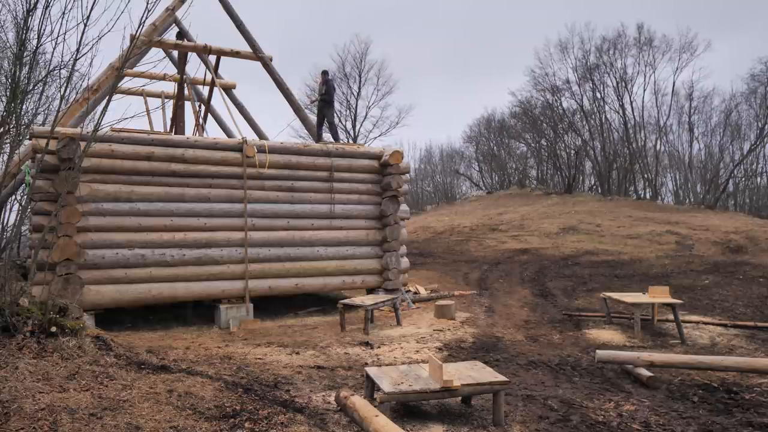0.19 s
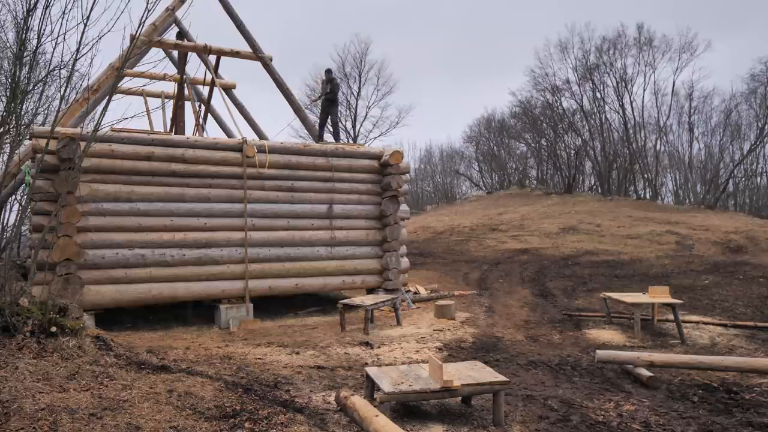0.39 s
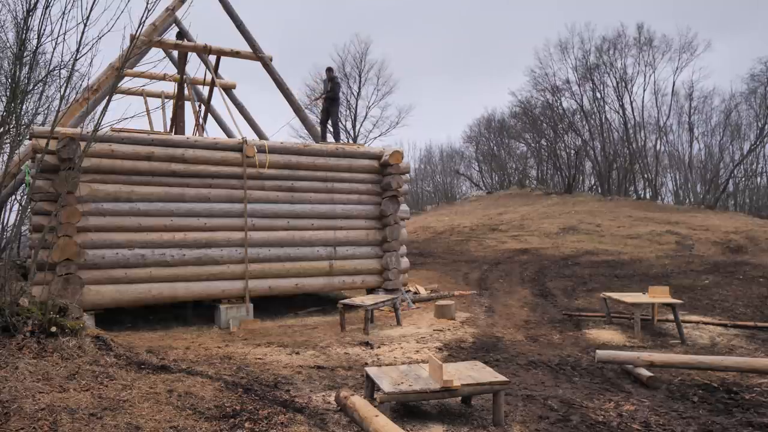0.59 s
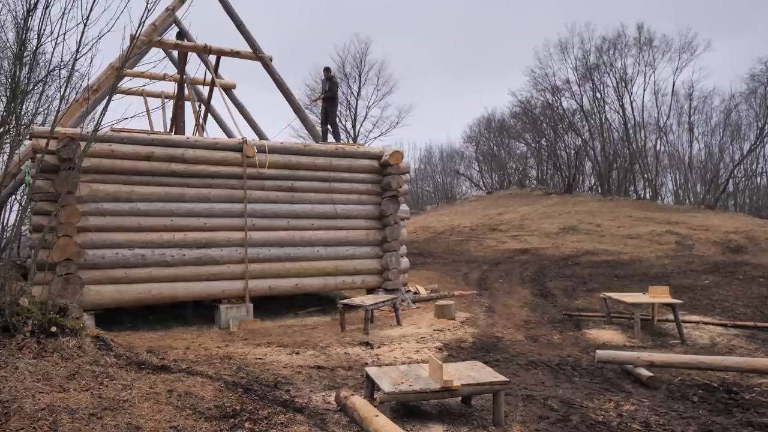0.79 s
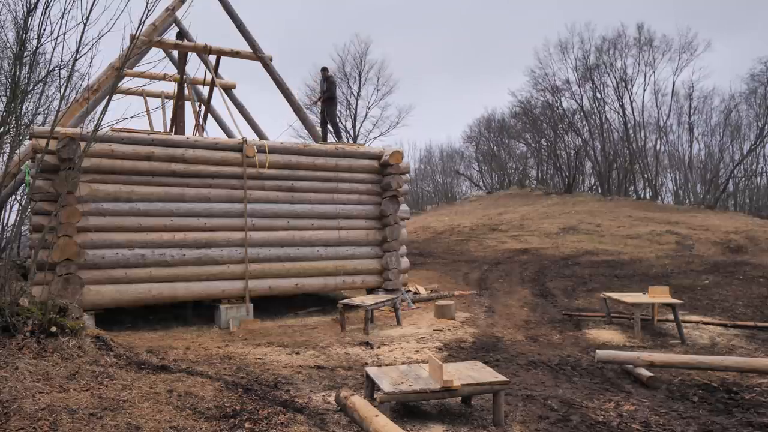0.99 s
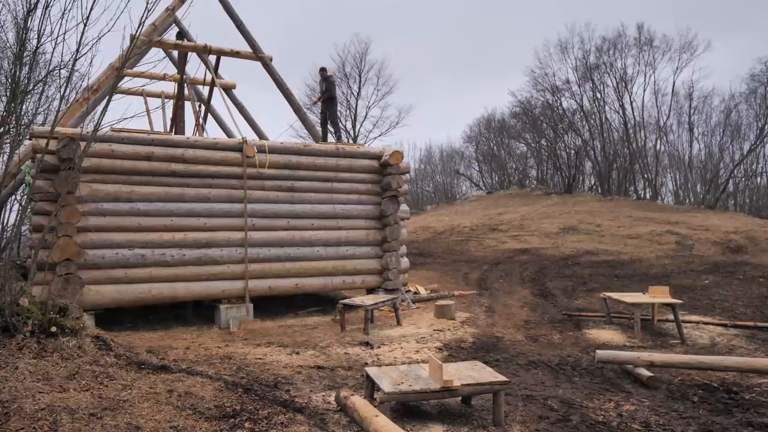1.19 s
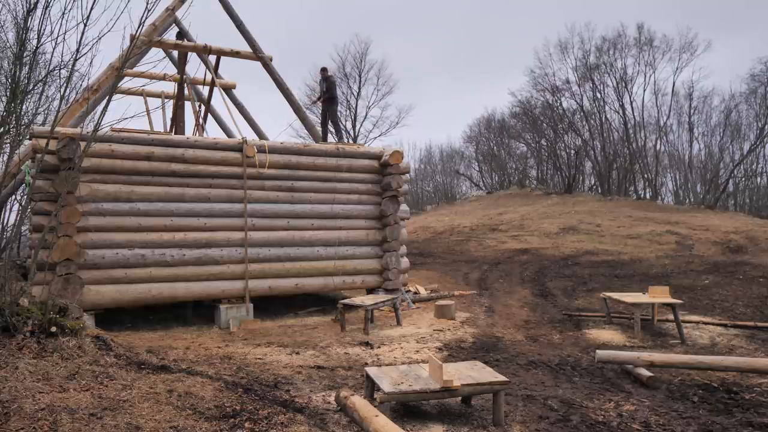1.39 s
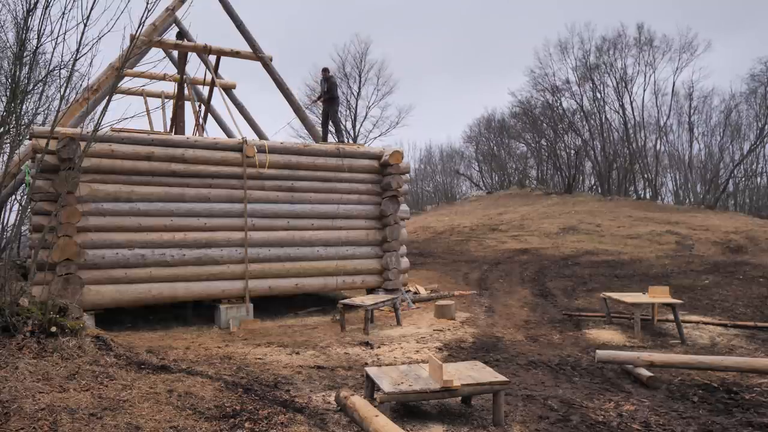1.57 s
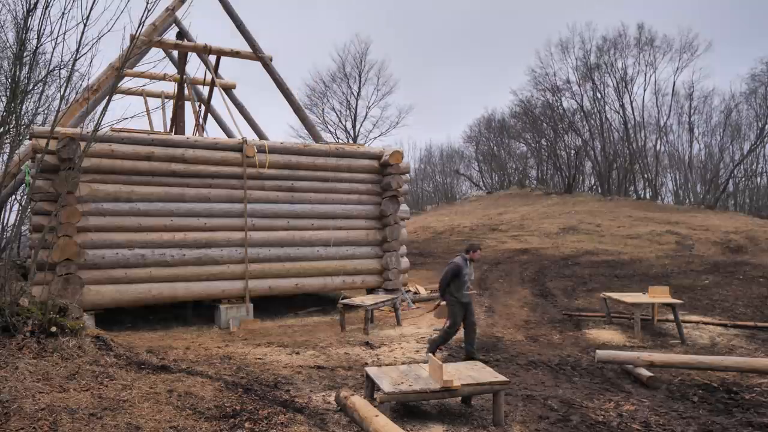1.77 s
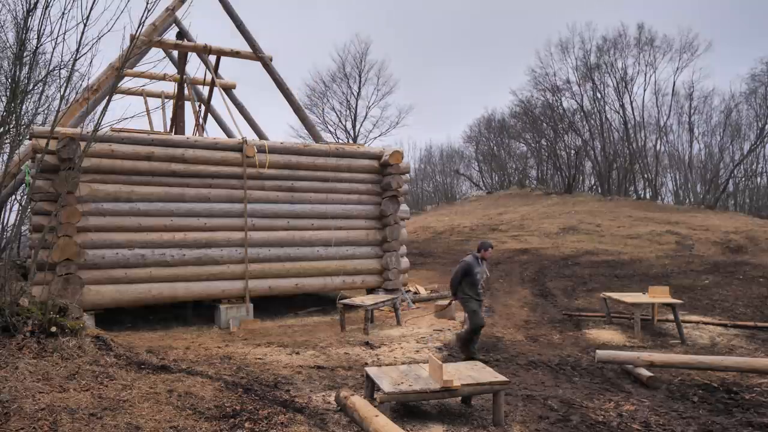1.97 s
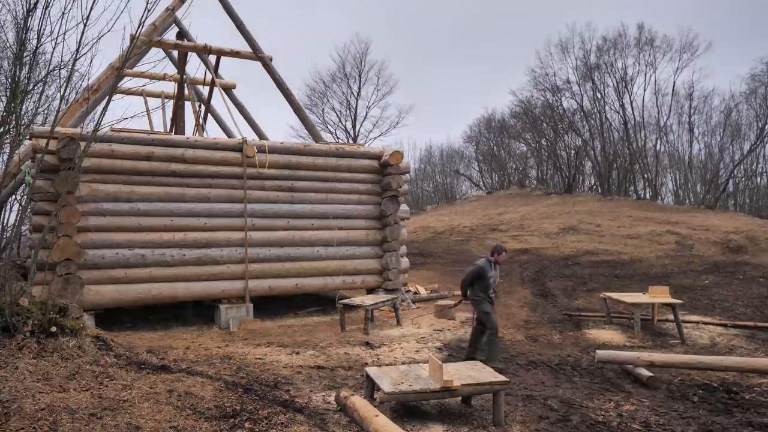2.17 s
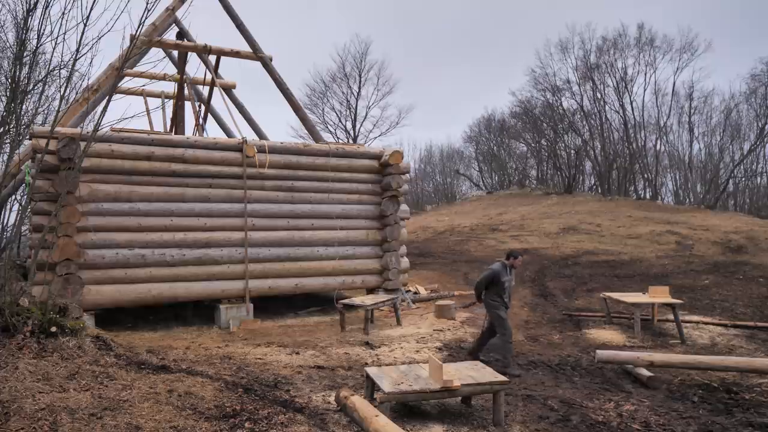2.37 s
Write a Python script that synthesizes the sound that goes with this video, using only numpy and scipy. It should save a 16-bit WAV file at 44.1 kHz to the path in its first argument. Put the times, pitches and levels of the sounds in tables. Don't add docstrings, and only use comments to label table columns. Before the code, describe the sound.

A bundle of metal tools bumps and scrapes over hollow timber, knocking, clanking and jingling for just over a second, then thins to tiny ticks and a soft step on wood chips, quiet outdoor air, close camera microphone.

```python
import sys
import numpy as np
from scipy import signal
from scipy.fft import rfft, irfft
from scipy.io import wavfile
from scipy.ndimage import uniform_filter1d

SR = 44100
rng = np.random.default_rng(int(sys.argv[2]) if len(sys.argv) > 2 else 0)


def master_out(mix):
    frames = np.transpose(np.atleast_2d(mix))
    ceiling = np.clip(frames, -1, 1)
    pcm = np.round(ceiling * 32767).astype(np.int16)
    wavfile.write(sys.argv[1], SR, pcm)


def how_loud(loudness_db):
    steps = np.asarray(loudness_db, float) / 20
    return 10 ** steps


N = 110250
T = np.arange(N) / SR
HIT_T = T[:SR // 3]
RING_RISE_S = .005
SCRAPE_ATTACK_S = 0.0091


def noise(count=N):
    return rng.standard_normal(count)


def unit(x):
    return x / np.sqrt(np.mean(x ** 2))


def band(x, hz, width_hz):
    centre_hz = min(hz, SR / 3)
    b, a = signal.iirpeak(centre_hz, centre_hz / min(width_hz, SR / 3), fs=SR)
    return signal.lfilter(b, a, x)


def band_twice(x, hz, width_hz, second_width_hz):
    return band(band(x, hz, width_hz), hz, second_width_hz)


def fade(t, t60_s):
    return np.exp(-np.log(1000) * t / t60_s)


def tone(t, hz, t60_s):
    return np.sin(2 * np.pi * hz * t) * fade(t, t60_s)


def add(out, at_s, x):
    i = int(at_s * SR)
    out[i:i + len(x)] += x[:N - i]


def walk(rate_hz):
    k = int(SR / rate_hz)
    return unit(uniform_filter1d(uniform_filter1d(noise(), k), k))


def grit():
    grain_db = 2 * np.minimum(rng.exponential(size=N), 5)
    return unit(noise() * how_loud(grain_db))


def slips():
    slips_per_s, slip_s, slip_gain = 160, .003, .5
    kicks = (rng.random(N) < slips_per_s / SR) * np.minimum(rng.exponential(size=N), 2)
    bumps = signal.lfilter([1], [1, -np.exp(-1 / (slip_s * SR))], kicks)
    return unit(1 + slip_gain * bumps)


def air():
    # [f/Hz, level/dB per Hz]
    spectrum = [(18, -43), (30, -1), (324, -2), (728, -10.5), (874, -10), (1230, -14.5), (15500, -28)]
    hz, db = np.array(spectrum).T
    f = np.maximum(np.fft.rfftfreq(N, 1 / SR), 1)
    spec = rfft(noise()) * how_loud(np.interp(np.log(f), np.log(hz), db))
    out = 0
    for centre_oct in np.arange(4, 15, .5):
        share = np.clip(1 - 2 * abs(np.log2(f) - centre_oct), 0, 1)
        out = out + irfft(spec * share, N) * how_loud(1.5 * walk(7))
    return unit(out) * how_loud(-49)


def rumble():
    # [t/s, level/dB]
    drag = [(0, -41.5), (.11, -40.5), (.14, -40), (.27, -23.5), (0.309, -19.5), (.41, -25.5), (.53, -38),
            (.65, -36), (.71, -32), (.9, -24.5), (.95, -29), (1.15, -41.5), (1.32, -58)]
    # [f/Hz, width/Hz, level/dB]
    resonances = [(121, 43, -2), (253, 99, -1.5), (356, 76, -3.5), (626, 184, 1), (952, 390, -2),
                  (1545, 580, -6), (2450, 950, -25)]
    bumps = slips()
    body = 0
    for hz, width_hz, db in resonances:
        resonance = unit(band_twice(bumps * grit(), hz, width_hz, 2.84 * width_hz))
        body = body + how_loud(db + 4.7 * walk(23.8)) * resonance
    times_s, db = np.array(drag).T
    return unit(body) * how_loud(np.interp(T, times_s, db, right=-90))


def jingle(scraped):
    modes_hz = [3330, 3880, 4470, 5870, 6230, 7420, 7850, 8230, 8540, 9020, 11000, 11900, 12400, 13500]
    drive = [scraped * np.maximum(walk(33.4) - 1, 0) for _ in modes_hz]
    return how_loud(-14) * 10 * sum(band(x, hz, 90) for x, hz in zip(drive, modes_hz))


def scrapes():
    # [start t/s, hold/s, release t60/s, level/dB, f/Hz]
    bursts = [(0, .045, .05, -52.5, 5000), (0.109, 0.073, 0.11, -52, 4840),
              (0.211, 0.007, 0.071, -32, 4640), (0.378, 0.025, 0.14, -42.5, 6000),
              (0.551, 0.049, 0.044, -37, 8000), (0.6355, 0.0047, 0.055, -8, 5640),
              (0.657, 0.1, 0.38, -39, 5760), (0.72, 0.04, 0.17, -35, 6600), (0.81, 0.018, .05, -36.5, 7500),
              (0.826, 0.1, 0.31, -24, 8000), (0.949, 0.051, 0.058, -17.5, 8100),
              (0.967, 0.037, 0.042, -23, 2780), (1.009, 0.12, 0.58, -34.5, 4700),
              (1.036, 0.051, 0.68, -31.5, 1670), (1.225, 0.012, 0.038, -35.5, 10000),
              (1.332, .004, 0.079, -34.5, 7080), (1.721, 0.02, .03, -55, 6000),
              (1.821, 0.018, 0.26, -51, 10000), (2.065, 0.036, 0.061, -49.5, 2500),
              (2.08, 0.028, 0.12, -44.5, 4500), (2.114, 0.061, 0.066, -46, 2200),
              (2.307, 0.24, .1, -52.5, 1290)]
    rough = grit() * slips()
    out = 0
    for at_s, hold_s, t60_s, db, hz in bursts:
        rise = np.clip((T - at_s) / SCRAPE_ATTACK_S, 0, 1)
        shape = rise * fade(np.maximum(T - at_s - hold_s, 0), t60_s)
        out = out + how_loud(db) * shape * unit(band_twice(rough, hz, 2.26 * hz, 1.39 * hz))
    return out + jingle(out)


def ticks():
    # [t/s, level/dB, f/Hz, t60/s]
    events = [(.001, -37.5, 3830, .03), (.0368, -44, 3750, 0.04), (.0985, -53, 5100, .04),
              (0.1477, -43, 3870, .06), (.150, -42, 7560, .04), (.1615, -39, 5380, .05),
              (.162, -48, 9400, .04), (.165, -50, 3900, 0.069), (0.2467, -32, 4340, .035),
              (0.31, -29, 5360, .02), (.310, -42, 7500, .015), (0.364, -27, 5060, 0.015),
              (.370, -28.5, 5400, 0.03), (.371, -30, 4100, .015), (.372, -38.5, 9000, 0.034),
              (.3885, -22, 4120, 0.023), (.390, -28, 7700, .015), (.397, -33, 4350, .05),
              (.407, -35, 7000, .02), (.6068, -5, 5150, 0.016), (.640, -12.5, 9860, .02),
              (.641, -22.5, 7350, .04), (.8188, -29.5, 7310, 0.027), (.850, -25, 5400, .04),
              (.946, -24, 11600, .02), (.996, -14.5, 2850, 0.032), (1.068, -31.5, 8300, .03),
              (1.076, -30, 9020, .03), (1.263, -39, 4850, .035), (1.264, -44, 2920, 0.022),
              (1.337, -29, 2300, 0.014), (1.3385, -22, 4810, 0.023), (1.339, -30.5, 5690, .03),
              (1.339, -34, 7000, .05), (1.339, -33, 9300, 0.023), (1.43, -48, 4240, 0.032),
              (1.725, -56, 8450, .035), (1.737, -49, 8490, .035), (1.8235, -51, 8440, .03),
              (1.826, -47.5, 4820, 0.038), (2.063, -43, 1400, .04), (2.091, -38.5, 2180, 0.046),
              (2.1451, -37, 2300, .03), (2.155, -42, 2000, .04)]
    out = np.zeros(N)
    for at_s, db, hz, t60_s in events:
        snap = band_twice(noise(len(HIT_T)), hz, hz, hz) * fade(HIT_T, t60_s / 2)
        add(out, at_s, how_loud(db) * (tone(HIT_T, hz, t60_s) + how_loud(-0.5) * snap))
    return out


def snaps():
    # [t/s, level/dB]
    events = [(.038, -44), (0.2156, -24), (.331, -33), (.3521, -26.5), (.371, -36), (.3885, -32),
              (.407, -40), (.5516, -24), (.5601, -24), (0.57, -26), (.579, -24), (.590, -19), (.594, -17),
              (.6046, -21.5), (.638, -6), (.830, -21.5), (1.1, -19), (.935, -19), (.954, -9), (.961, -17),
              (1.230, -26), (1.337, -16.5), (1.5194, -34.5), (1.7245, -42), (1.739, -46), (1.853, -42),
              (2.367, -39)]
    out = np.zeros(N)
    for at_s, db in events:
        snap = band_twice(noise(len(HIT_T)), 6000, 11000, 14000)
        add(out, at_s, how_loud(db) * snap * fade(HIT_T, 0.0046))
    return out


def thud(hz, t60_s, thud_hz):
    out = 0
    for f in 250 * 2 ** np.arange(0, 4, .6):
        x = noise(len(HIT_T)) + 15.4 * (HIT_T == 0)
        x = unit(band(band_twice(x, f, f, f), f, f))
        shape = fade(HIT_T, t60_s * (hz / f) ** 1.4) * (1 - np.exp(-HIT_T * f))
        out = out + x * shape * how_loud(-13.5 * abs(np.log2(f / thud_hz)))
    return out / 4


def knock_rise():
    return 1 - np.exp(-HIT_T / 0.00098)


def thuds():
    # [t/s, level/dB, t60/s, f/Hz]
    events = [(.0575, -17, 0.08, 1100), (.207, -4.5, 0.11, 395), (.217, -6.5, 0.07, 1450),
              (.3545, -5, 0.067, 1600), (.372, -8, 0.11, 690), (.748, -19, 0.051, 2000),
              (.776, -7.5, 0.054, 900), (.980, -2.5, 0.044, 910), (1.050, -10, 0.068, 700),
              (1.111, -7, 0.041, 810), (1.5707, -12, 0.034, 1200), (1.587, -23, 0.08, 400),
              (2.089, -14.5, 0.035, 560), (2.112, -15.5, 0.048, 450), (2.152, -24.5, 0.082, 500)]
    out = np.zeros(N)
    for at_s, db, t60_s, hz in events:
        add(out, at_s, how_loud(db) * thud(hz, t60_s, hz) * knock_rise())
    return out


def knocks():
    # [t/s, level/dB, body f/Hz, t60/s, thud f/Hz]
    events = [(.121, -20.5, 605.6, 0.24, 340), (0.276, -3.5, 902, 0.054, 1310),
              (.295, -8.5, 926, 0.052, 890), (0.3036, -8.5, 940, 0.022, 900), (.559, -24, 735, .1, 2100),
              (0.577, -14, 781, 0.08, 2000), (.604, -10.5, 792, 0.084, 600), (0.6368, -7, 413, 0.1, 467),
              (.719, -14, 766, .06, 2000), (.727, -7, 784, 0.09, 1670), (.741, -14, 788, 0.15, 2000),
              (.8595, 0.5, 783.5, 0.077, 1430), (.876, -14, 406.5, 0.23, 520),
              (2.0965, -20, 231, 0.069, 397)]
    out = np.zeros(N)
    for at_s, db, hz, t60_s, thud_hz in events:
        wobble_db = 3.5 * walk(134)[:len(HIT_T)]
        body = tone(HIT_T, hz, t60_s) * how_loud(wobble_db)
        add(out, at_s, how_loud(db) * (.5 * body + how_loud(5) * thud(hz, t60_s, thud_hz)) * knock_rise())
    return out


def booms():
    # [t/s, level/dB, f/Hz]
    events = [
        (0.134, -23, 144),
        (0.217, -23.5, 135),
        (.285, -18.5, 146.6),
        (0.319, -28, 125),
        (0.641, -18.5, 127),
        (0.726, -21.5, 116),
        (0.808, -32, 109),
        (0.97, -23, 92),
        (1.04, -30.5, 109),
        (1.101, -30, 114),
    ]
    rise = 1 - np.exp(-(HIT_T / 0.0053) ** 2)
    out = np.zeros(N)
    for at_s, db, hz in events:
        add(out, at_s, how_loud(db) * tone(HIT_T, hz, 0.15) * rise)
    return out


def rings():
    # [t/s, f/Hz, level/dB, t60/s, stopped after/s]
    events = [(1.065, 5262, -32, 3.0, .064), (1.124, 5262, -29.5, .33, .078), (1.208, 5274, -38, 1.0, .022),
              (.135, 3900, -50, 1.0, .057), (1.311, 5270, -51, .3, .022), (1.36, 4885, -59, 2.0, .09),
              (1.455, 5044, -54.5, 3.0, .105), (1.56, 5040, -52.5, .8, .165), (1.468, 6029, -51, .6, .17),
              (1.456, 8430, -54, .6, .14), (1.457, 9835, -52, .5, .22)]
    out = np.zeros(N)
    for at_s, hz, db, t60_s, stop_s in events:
        rise = np.clip(HIT_T / RING_RISE_S, 0, 1)
        stopped = np.clip((stop_s - HIT_T) / RING_RISE_S, 0, 1)
        flutter_db = 1.8 * walk(115)[:len(HIT_T)]
        add(out, at_s, how_loud(db + flutter_db) * tone(HIT_T, hz, t60_s) * rise * stopped)
    return out


def clatter():
    # [start t/s, length/s, level/dB]
    events = [
        (.549, 0.022, -33),
        (0.72, 0.042, -33),
    ]
    loose = unit(band_twice(grit() * slips() * slips(), 2010, 620, 620))
    out = 0
    for at_s, hold_s, db in events:
        release = fade(np.maximum(T - at_s - hold_s, 0), SCRAPE_ATTACK_S * 10)
        out = out + how_loud(db) * loose * (T > at_s) * release
    return out


def steel_modes(ring, focus_hz=None):
    modes_hz = np.array([4370, 4860, 7273, 7372, 8235, 8420, 9060, 12130, 13500])
    # [level/dB, t60/s]
    modes = [(-19.5, 0.15), (1, 0.04), (-23, 0.092), (-6, 0.1), (-3.5, 0.04), (-8, 0.11), (-20, 0.045),
             (-2.5, 0.057), (-11, 0.066)]
    out = 0
    for hz, (db, t60_s) in zip(modes_hz, modes):
        focus_db = -46 * abs(np.log2(hz / focus_hz)) if focus_hz else 0
        out = out + how_loud(db + focus_db) * tone(HIT_T, hz, t60_s * ring)
    return out


def crack():
    return band(noise(len(HIT_T)), 7000, 12000) * np.exp(-HIT_T / 0.0033)


def square_blow():
    held_s = 0.028
    out = np.zeros(N)
    ringing = steel_modes(1) * np.clip((held_s - HIT_T) / RING_RISE_S, 0, 1)
    add(out, .6068, how_loud(-7) * (ringing + how_loud(-3) * crack()))
    return out


def clinks():
    # [t/s, level/dB, hardest-struck f/Hz, ring factor]
    events = [(0.832, -13, 8400, 0.27), (0.833, -17, 4300, .3), (0.8803, -12, 12500, 1.3),
              (.881, -19.5, 4370, .5), (.886, -12.5, 7360, 1.2), (.889, -5.5, 8550, 0.6),
              (.892, -13.5, 13500, .4), (.893, -11, 7360, 1.2), (.909, -5.5, 8500, 0.53),
              (0.919, -18, 4250, 0.45), (0.9532, -2.5, 8500, 0.42), (0.962, -7, 7260, 0.55),
              (1.003, -10, 7400, 0.46), (1.033, -23.5, 8400, .6), (1.0762, -36, 12130, 1.5),
              (1.1985, -22, 7200, 0.5)]
    out = np.zeros(N)
    for at_s, db, hz, ring in events:
        add(out, at_s, how_loud(db) * (steel_modes(ring, hz) + how_loud(-15) * crack()))
    return out


def wall_echo(near):
    count = SR // 4
    wall = band(noise(count), 1800, 4200) * fade(T[:count], 0.26)
    return how_loud(-17.5) * signal.fftconvolve(near, wall / np.sqrt(np.sum(wall ** 2)))[:N]


def scene():
    friction = rumble() + scrapes() + clatter()
    wood = thuds() + knocks() + booms()
    steel = ticks() + snaps() + rings() + square_blow() + clinks()
    near = friction + wood + steel
    return (near + wall_echo(near) + air())[None]


def roll_off(x):
    return signal.sosfilt(signal.butter(12, 15680, fs=SR, output="sos"), x)


def record(dry):
    x = signal.sosfilt(signal.butter(2, 46, "high", fs=SR, output="sos"), dry)
    x = signal.sosfilt(signal.ellip(8, .2, 70, 15650, fs=SR, output="sos"), x)
    mix = np.clip(x, -1, 1)
    return roll_off(mix)


dry = scene()
out = record(dry)
master_out(out)
```